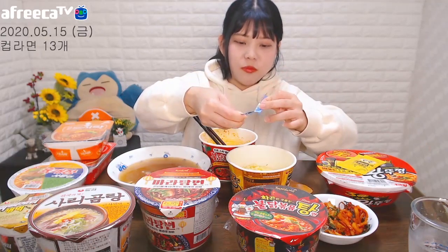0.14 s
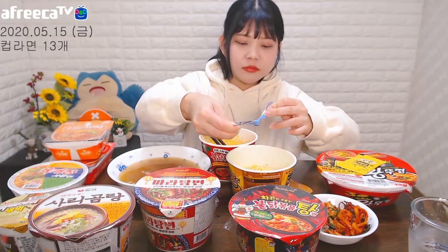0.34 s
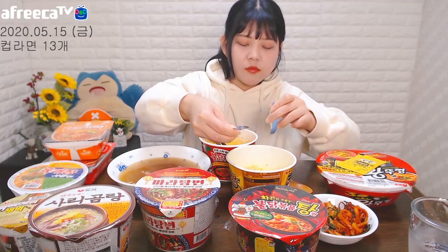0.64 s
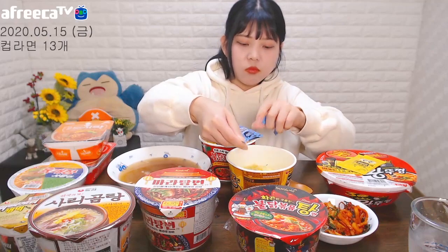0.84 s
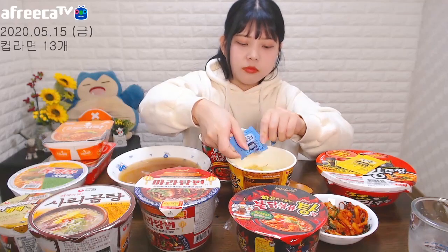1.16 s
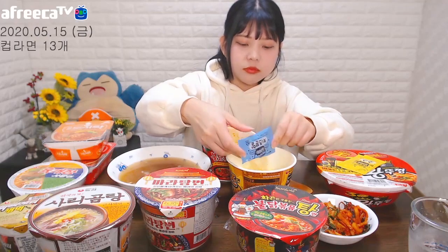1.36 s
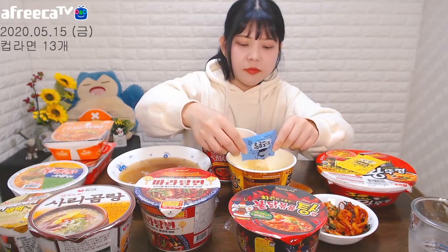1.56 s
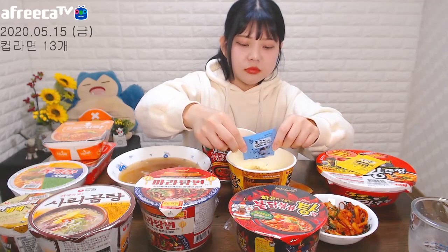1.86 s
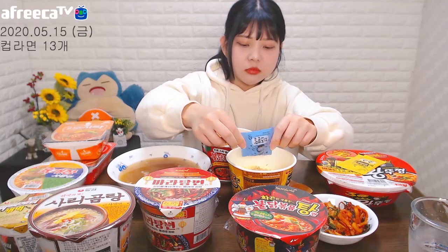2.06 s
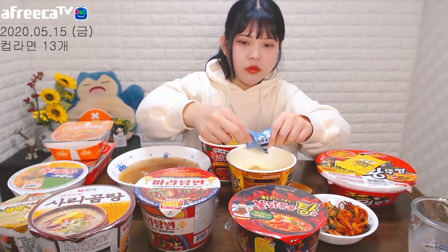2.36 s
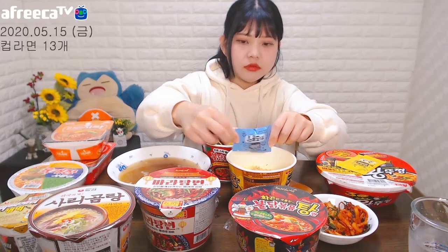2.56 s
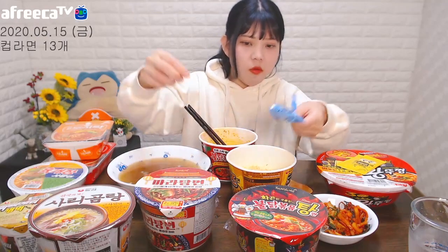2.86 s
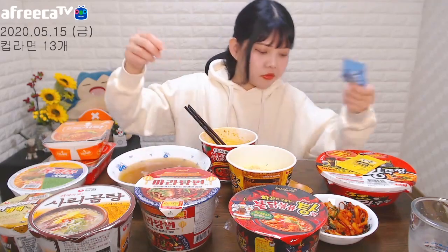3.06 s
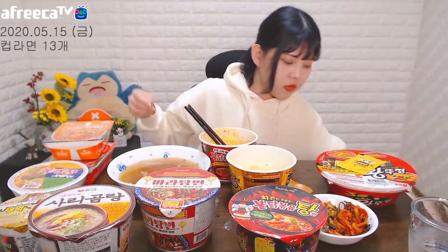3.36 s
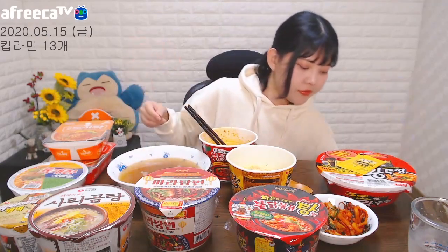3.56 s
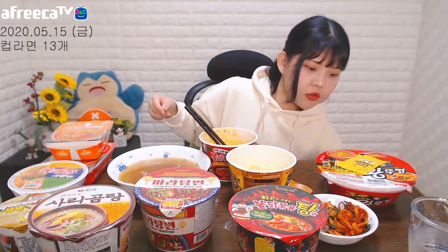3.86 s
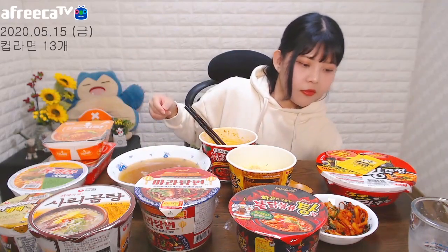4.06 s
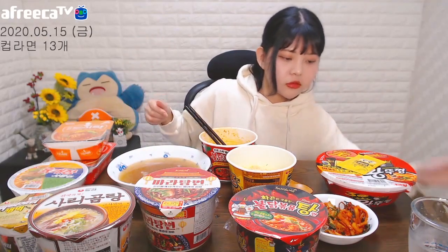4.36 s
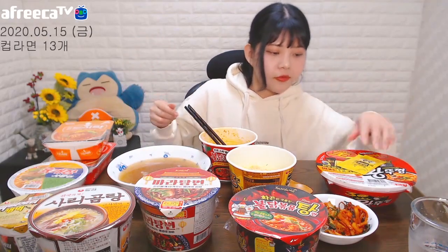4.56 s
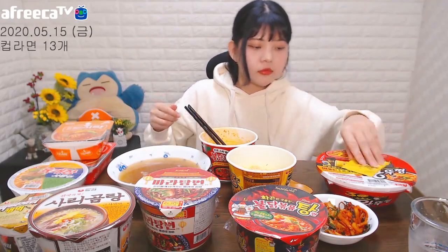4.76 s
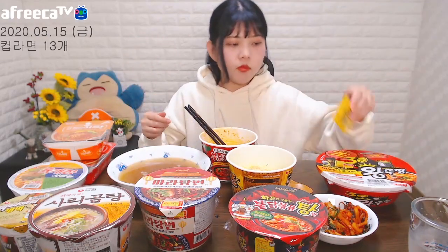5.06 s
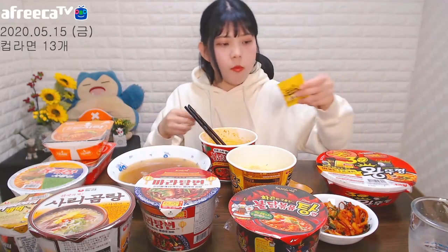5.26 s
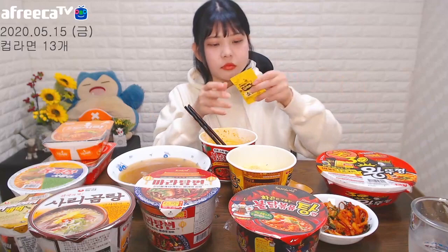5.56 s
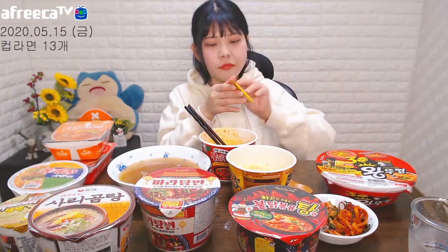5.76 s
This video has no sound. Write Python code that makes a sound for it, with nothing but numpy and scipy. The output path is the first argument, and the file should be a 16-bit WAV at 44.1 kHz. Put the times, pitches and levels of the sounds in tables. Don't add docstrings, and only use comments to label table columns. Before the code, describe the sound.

A small plastic sachet is handled close up: scattered light crinkles at first, then louder squeezing and a dense burst of tearing crackle. After it is dropped aside come sparse snaps, faint brushing, a dull thud and knock, and light handling of another packet. Small hard room, stereo microphone with dull treble and noise-suppressed quiet.

```python
import sys
import numpy as np
from scipy import signal
from scipy.fft import rfft, irfft, next_fast_len
from scipy.io import wavfile
from scipy.ndimage import uniform_filter1d, map_coordinates

SR = 44100
rng = np.random.default_rng(int(sys.argv[2]) if len(sys.argv) > 2 else 0)


def invert_db(level):
    return 10 ** (np.asarray(level, dtype=float) / 20)


def dump(signal):
    limited = np.clip(np.atleast_2d(signal).T, -1, 1)
    pcm = np.round(limited * 32767).astype(np.int16)
    wavfile.write(sys.argv[1], SR, pcm)


N = 260659


def unit(x):
    return x / np.sqrt(np.mean(abs(x) ** 2) + 1e-30)


def along(points, hz):
    f, v = np.transpose(points)
    return np.interp(np.log(hz + 1), np.log(f + 1), v)


def curves(rows, t=np.arange(N) / SR):
    s, *cols = np.transpose(rows)
    return [np.interp(t, s, c) for c in cols]


def wobble(rate_hz):
    knots = rng.standard_normal(int(N * rate_hz / SR) + 4)
    return map_coordinates(knots, [np.arange(N) * rate_hz / SR])


def patchy(shape, bins, frames):
    rough = rng.standard_normal(shape)
    return unit(uniform_filter1d(uniform_filter1d(rough, size=bins, axis=0), size=frames, axis=1))


def filtered(x, response):
    m = next_fast_len(x.shape[-1] + 8192)
    return irfft(rfft(x, m) * response(np.fft.rfftfreq(m, 1 / SR)), m)[..., :x.shape[-1]]


def modes(table, hz):
    total = 0
    for k, (centre_hz, width_hz, db) in enumerate(table):
        damping = 1j * hz * width_hz
        total = total + (-1) ** k * invert_db(db) * damping / (centre_hz ** 2 - hz ** 2 + damping)
    return total


def swells(s, db, rise_s, fade_s, t):
    s, db, rise_s, fade_s = (np.reshape(v, (-1, 1)) for v in (s, db, rise_s, fade_s))
    slope = np.maximum((s - t) / np.maximum(rise_s, .005), (t - s) / np.maximum(fade_s, .005))
    return invert_db(2 * np.maximum(db - 60 * slope, -130))


def loudness(*events):
    steps = np.arange(0, N, 32)
    return np.interp(np.arange(N), steps, np.sqrt(swells(*events, steps / SR).sum(axis=0)))


# frequency in Hz, left-right likeness 0..1.
LIKENESS = [(60, .85), (150, .95), (400, .97), (850, .92), (1150, .15), (2800, .25), (5000, .5), (9000, .3)]


def spread(pair):
    def mid_side(hz):
        turn = np.arccos(np.clip(along(LIKENESS, hz), -1, 1)) / 2
        return np.array([np.cos(turn), np.sin(turn)])
    mid, side = filtered(pair, mid_side)
    return np.array([mid + side, mid - side])


# time in s, left over right in dB, left hears later in ms, direct sound in dB.
HANDS = [(0, -3, 0.016, -1), (1, -1.5, 0.054, -1), (2.5, -1.2, 0.011, 3.5), (2.8, -0.5, 0.045, 0),
         (3.1, -4, 0.066, 0), (3.7, -2, 0.19, -1.5), (4.3, -7.5, 0.068, -3.5), (4.7, -4.5, 0.054, -0.5),
         (5.2, -6.5, .03, -3.5), (5.8, -3, 0.011, 1.5)]


def grains(s, hz, cycles, db, size):
    place = rng.standard_normal((len(s), 3))
    pan_db, lag_ms, _ = curves(HANDS, s)
    at = np.clip((s[:, None] * SR).astype(int) + np.arange(size), 0, N - 1).ravel()
    turns = np.arange(size) / SR * hz[:, None]
    attack = 1 - np.exp(-turns / 0.65)
    fade = invert_db(db[:, None] - 26 * turns / cycles[:, None]) * attack * np.sign(place[:, 2:])
    lag_turns = hz[:, None] * (lag_ms[:, None] / 2000 + 1.6e-5 * place[:, 1:2])
    step_db = 1.2 * place[:, :1] + pan_db[:, None] / 2 * np.clip(hz[:, None] / 1200, 0, 1)
    sides = []
    for side in (1, -1):
        wave = fade * invert_db(side * step_db) * np.sin(2 * np.pi * (turns - side * lag_turns))
        sides.append(np.bincount(at, wave.ravel(), N))
    return np.array(sides)


# frequency in Hz, level in dB per Hz.
FILM = [(710, -36), (1200, -6), (1430, -12), (2180, -5.5), (2360, -6.5), (3790, -9.5), (4700, -8.5),
        (6510, -11.5), (8000, -9), (10400, -53), (17600, -120)]
# start in s, peak in dB, facet in Hz, edge in dB, knock in dB.
FINGERING = [(0.0126, -40.5, 2000, -1, -11), (0.0442, -34, 5540, 1, -10), (.1112, -34.5, 5960, -7, -39),
             (.1145, -37, 2200, 4.5, -20), (.1215, -50.5, 2930, 6, -3), (0.2527, -33, 1980, 2, -8.5),
             (0.4543, -36.5, 2300, 3, 1), (.5187, -44, 1480, -13, 0), (0.6984, -47, 1620, -8, -1.5),
             (0.7214, -39, 6530, -33, -13.5), (.818, -53, 2200, -4, -20), (0.897, -41.5, 2200, -9, -23),
             (.9353, -35.5, 2970, -27, -7.5), (0.9609, -42, 2330, 8.5, 2.5), (0.9867, -33.5, 5070, -1, -29),
             (1.0121, -40, 4320, -5, -8), (1.034, -42, 2190, 1.5, 3.5), (1.045, -50, 2500, -11, 0),
             (1.0965, -32.5, 2190, -15, -6), (1.224, -43.5, 1870, 1, -4), (1.233, -42, 3000, -7, -6.5),
             (1.3154, -48, 3240, -2, -9), (1.3288, -48, 1750, 6, 6), (1.3745, -37.5, 1990, -30, -10.5),
             (1.4062, -44, 2200, 1, -7.5), (1.4536, -58, 2220, -17, -3), (1.479, -40.5, 2550, -5, -5)]
SQUEEZING = [(1.508, -30.5, 2530, -5, -2), (1.515, -21.5, 2810, -6.5, -20),
             (1.5447, -31.5, 2180, -19, -2.5), (1.5742, -31.5, 2220, 0.5, -1.5),
             (1.614, -43, 1830, -16, 6.5), (1.7017, -24, 2560, -8.5, -10.5), (1.745, -45, 1850, -2, -11),
             (1.7624, -33, 1760, -6.5, -4.5), (1.777, -37.5, 2060, -6.5, 0), (1.8034, -29, 4600, -7, -8),
             (1.8553, -24.5, 2200, 1, -11), (1.9035, -34, 2310, -0.5, -16.5),
             (1.9269, -33.5, 1920, -10.5, 4), (1.942, -33, 2220, -4.5, -5), (2.032, -31, 2130, -6, -6.5),
             (2.0511, -33.5, 2250, -7.5, -12), (2.085, -46.5, 2250, -7.5, -8.5)]
TEARING = [(2.1113, -36.5, 1960, -8.5, -5.5), (2.1198, -18, 2100, -6, -8),
           (2.127, -27.5, 4000, -14.5, -19.5), (2.1394, -27.5, 2000, -8, 1),
           (2.1455, -31.5, 2380, -7, -1.5), (2.1595, -23, 2230, -2.5, -8), (2.168, -27, 3580, -8.5, -11),
           (2.2043, -26, 2190, -5.5, -5), (2.229, -34, 2570, -12, -12), (2.2554, -20.5, 2270, -3, -13),
           (2.2853, -28.5, 2120, -6, -4.5), (2.3081, -23, 4300, -12.5, -7),
           (2.3267, -21, 2240, -15.5, -2.5), (2.337, -29, 2180, -6.5, 5), (2.3452, -26.5, 2690, -2, -6.5),
           (2.3551, -24, 2080, -2, -4), (2.3877, -27, 5750, -11.5, -14.5),
           (2.4044, -24.5, 2200, -8.5, -10.5), (2.413, -26, 2040, -1.5, -3.5),
           (2.4274, -25.5, 2800, -11, -7), (2.4367, -22.5, 2490, -3, -12), (2.4436, -19, 5500, -4, -12),
           (2.4492, -37, 2130, -12.5, -5), (2.455, -28.5, 4800, -11, -16.5), (2.4751, -27, 2700, -4.5, -13),
           (2.4885, -26, 4740, -5.5, -9.5), (2.5037, -25.5, 2240, -10, -6.5),
           (2.52, -35, 2300, -9.5, -10.5), (2.5452, -28.5, 2600, -13, -6.5), (2.581, -28, 2040, -7, -1),
           (2.6058, -26, 5070, -8.5, -9.5)]
DISCARDING = [(2.742, -46, 1920, -5, 5), (2.7981, -37.5, 3760, -35, -5.5), (2.81, -42.5, 1690, -24, -3),
              (3.05, -40.5, 4090, -31, -4), (3.063, -26.5, 2110, -11.5, -22.5),
              (3.448, -62.5, 1840, -21, -23), (3.459, -35, 1555, -20, -2), (3.5095, -35, 2490, -4.5, -13),
              (3.5683, -36.5, 4630, -21, -10), (3.7, -43.5, 1980, -2, 1), (3.711, -35, 1950, -14, -11),
              (3.799, -46, 2130, -11, -11), (3.894, -41.5, 1864, -18.5, 2.5), (3.964, -37.5, 2440, -9, -21),
              (3.804, -61, 2950, -15, -12), (4.1728, -48.5, 3086, -16, -17), (4.348, -57, 2460, -30, 5),
              (4.6129, -40.5, 1660, -4.5, -2.5)]
PICKING_UP = [(4.721, -44.5, 1590, -8, 6), (4.7608, -38, 3840, -22, -2), (4.807, -43.5, 1733, -17, -12),
              (4.9504, -48, 2160, 3.5, 4), (5.0957, -51, 3100, 3, -0.5), (5.1568, -48.5, 2135, -12, -3.5),
              (5.5095, -62, 2313, -15.5, 2), (5.692, -58, 3730, -3, 5), (5.77, -57, 2230, -2, -16),
              (5.571, -64.5, 3920, -21, -17.5), (5.8118, -36.5, 2250, -4, 6),
              (5.8852, -50.5, 2170, -9.5, -9)]
# ring in Hz of what lies under the film (cup, cup, cup, bin, lid).
KNOCKED_HZ = [964, 940, 932, 1157, 500]
# how long edges keep cracking in s; the later, farther handlings crack longer.
VOLLEY_S = [0.005, 0.0042, 0.007, 0.011, 0.024]
FLIP_S = [0.0054, 0.0099, 0.0074, 0.015, 0.013]


def snaps(count=8):
    tables = FINGERING, SQUEEZING, TEARING, DISCARDING, PICKING_UP
    rows = []
    for table, *shared in zip(tables, KNOCKED_HZ, VOLLEY_S, FLIP_S):
        rows += [(*row, *shared) for row in table]
    columns = (np.repeat(c, count) for c in np.transpose(rows))
    s, peak_db, facet_hz, edge_db, knock_db, knock_hz, volley_s, flip_s = columns
    draw = rng.random((len(s), 5))
    order = np.arange(len(s)) % count
    later = (order + draw[:, 0]) / count * (order > 0)
    db = peak_db + 3.5 - 20 * abs(later - .14) - 4 * draw[:, 1]

    facet_hz = facet_hz * invert_db(6 * (draw[:, 2] - .45) * (.25 + .75 * (order % 2)))
    facet = grains(s + flip_s * later, facet_hz, 3 + 5 * draw[:, 3], db - 2.5, size=240)

    edge_hz = 3300 * (7300 / 3300) ** ((order * 3 % count + draw[:, 4]) / count)
    late_edge = draw[:, 3] ** 1.8
    favoured_hz = np.repeat(3800 + 3000 * draw[::count, 1], count)
    edge_db = edge_db + 0.5 - 8.3 * abs(np.log2(edge_hz / favoured_hz))
    edge_db = peak_db - 8 * late_edge + edge_db + 3 + 0.78 * along(FILM[1:-2], edge_hz)
    edge = grains(s + volley_s * late_edge, edge_hz, 7 + 9 * draw[:, 0], edge_db, size=120)

    knock_s = s + 1.2 * flip_s * later + 0.00086
    knock_hz = knock_hz * invert_db(1.3 * (draw[:, 3] - .5))
    knock = grains(knock_s, knock_hz, 7 + 8 * draw[:, 2], db + knock_db - 7.0, size=640)
    return facet + edge + knock


# peak in s, level in dB, 60 dB fade in s, brightness in dB per octave.
GRIPS = [(0.01, -54, 1.37, -7.5), (0.25, -52.5, 0.36, 22.5), (0.454, -53.5, 0.3, -8),
         (0.709, -72.5, 9, -0.5), (0.903, -59, -1, -4), (0.961, -45, 0.3, -11.5), (1.097, -58.5, 0.6, -5),
         (1.23, -63, 2.5, 1), (1.329, -61, 5, -8.5), (1.509, -40.5, 0.26, 1), (1.699, -46, 0.44, 2.5),
         (1.855, -54.5, 0.43, -3), (2.033, -47, 0.4, -2), (2.118, -38, 0.33, 1.5), (2.304, -33, 0.4468, 3),
         (2.424, -33, 0.3758, -1.5), (2.203, -40, 0.81, -1.5), (2.581, -36.5, 0.0457, -2),
         (2.609, -57, 0.09, -5.5), (2.799, -71.5, 1.2, -12), (3.064, -68.5, 0.37, -5),
         (3.464, -51, 0.5, -12.5), (3.559, -78, 1.5, 9), (3.705, -63, 0.8, -5), (3.897, -55, 0.68, -15),
         (3.968, -66, .5, -16), (4.171, -66.5, 0.2, -11), (4.349, -72.5, .5, -13), (4.613, -51.5, 0.33, -9),
         (4.752, -65, 0.89, -13.5), (4.934, -65, 0.96, -10.5), (5.098, -69.5, 0.3, -11.5),
         (5.808, -52, 0.1, 5.5)]
GRIP_RISE_S = 0.017


def crackle(count=8000):
    draw = rng.random((count, 4))
    s, hz = draw[:, 0] * N / SR, 1200 * (7600 / 1200) ** draw[:, 1]
    peak_s, peak_db, fade_s, bright_db = np.transpose(GRIPS)
    power = swells(peak_s, peak_db, GRIP_RISE_S, fade_s, s)
    level_db = 10 * np.log10(power.sum(0))
    bright_db = bright_db @ power / power.sum(0)
    patches = rng.standard_normal((140, 12))
    patch_db = 4 * map_coordinates(patches, [draw[:, 0] * 139, draw[:, 1] * 11])
    clump_db = 6.1 * wobble(40)[(s * SR).astype(int)] + patch_db
    tilt_db = (bright_db + 7.6) * np.log2(hz / 3000)
    db = level_db + 8.0 + tilt_db + along(FILM, hz) + clump_db - 7 * draw[:, 2]
    return grains(s, hz, 4 + 14 * draw[:, 3] ** 2, db, size=200)


# frequency in Hz, level in dB per Hz.
SIZZLE = [(1100, -38), (1700, -0.5), (2200, 2.5), (3500, -2.5), (5000, -2.5), (6500, -8), (8500, -8.5),
          (11000, -11.5)]


def sizzle():
    peak_s, peak_db, fade_s, _ = np.transpose(GRIPS)
    hz, _, z = signal.stft(rng.standard_normal((2, N)), SR, nperseg=256)
    level_db = along(SIZZLE, hz)[:, None] + 5 * patchy(z.shape[1:], bins=4, frames=6)
    hiss = signal.istft(z * invert_db(level_db), SR, nperseg=256)[1][:, :N]
    side_db = curves(HANDS)[0] / 2 * np.array([[1], [-1]])
    gain = loudness(peak_s, peak_db - 6, GRIP_RISE_S, 1.046 * fade_s)
    return gain * invert_db(side_db) * unit(spread(hiss))


# start in s, peak in dB, ring in Hz.
BUMPS = [(0.104, -48.5, 500), (.255, -53, 408), (.456, -60, 242), (.53, -51, 656), (1.511, -51.5, 284),
         (1.514, -39, 530), (1.58, -41.5, 624), (1.703, -34, 529), (1.706, -53, 312), (1.925, -40, 548),
         (1.93, -48, 270), (2.119, -41.5, 305), (2.145, -32.5, 526), (2.33, -43, 203), (2.345, -34, 523),
         (2.44, -37.5, 555), (2.494, -37, 669), (2.565, -42.5, 424), (3.53, -52, 835), (3.555, -51.5, 803),
         (3.97, -40, 1233), (4.008, -51, 1230), (4.05, -51, 1240), (4.095, -51.5, 1201),
         (4.612, -48.5, 156), (0.139, -47.5, 598), (2.033, -39, 480), (2.055, -49, 550),
         (2.934, -64.5, 253), (3.157, -62, 258), (3.25, -63, 652), (3.288, -58, 718), (3.419, -59, 367),
         (3.776, -60, 302), (3.962, -43, 245), (4.246, -59, 596), (4.47, -63.5, 620), (4.951, -48, 428),
         (5.147, -55, 441), (3.505, -42, 824), (4.348, -56.5, 243.5), (4.612, -36, 268.7),
         (4.611, -32, 822), (4.623, -37.5, 733), (4.716, -41.5, 618), (4.644, -42.5, 704),
         (4.75, -39.5, 682), (4.778, -46, 455), (5.458, -54.5, 449), (5.477, -61.5, 556), (5.609, -53, 558),
         (5.637, -46.5, 459), (5.688, -47, 476), (.168, -50, 670), (0.116, -49.5, 950), (1.142, -52.5, 950),
         (4.034, -48, 500), (3.425, -62, 712), (4.169, -57, 1260)]


def bumps(count=4):
    s, peak_db, hz = (np.repeat(c, count) for c in np.transpose(BUMPS))
    draw = rng.random((len(s), 3))
    later_s = 0.013 * draw[:, 0] * (np.arange(len(s)) % count > 0)
    hz = hz * invert_db(1.9 * (draw[:, 1] - .5))
    return grains(s + later_s, hz, 5 + 5 * draw[:, 2], peak_db - 3.0, size=1200)


# centre in Hz, width in Hz, level in dB.
LID = [(455, 230, -5.5), (530, 38, 1), (632, 95, -2.5)]
CUP = [(738, 55, -6.5), (802, 53, -6), (925.6, 25, 1), (1026, 27, -4.5), (1123, 45, -0.5),
       (1260, 100, -3.5)]
TABLE = [(230, 49, -3), (282, 24, 2), (367, 31, -3)]
SUDDEN_S = .012
# peak in s, level in dB, 60 dB rise in s, 60 dB fade in s,
# place (0 lids, 1 cup, 2 table top).
BRUSHES = [(.05, -54.5, 2, -0.5, 0.95), (.13, -61, 5.5, 0.77, 0), (0.462, -57.5, 1.5, 1.2, 0.96),
           (0.975, -52.5, 0.23, 0.57, 0.61), (1.231, -61.5, 0, 6.5, 0.8), (1.516, -42, 0.11, 0.4, 0.73),
           (1.708, -46, 0.1, 0.33, 0.92), (1.781, -50.5, -2.4, 0.5, 1.05), (1.923, -33.5, 0.15, 0.13, 0.64),
           (2.158, -36.5, 0.35, 0.47, 0.51), (2.215, -43, -0.74, .5, 0.89), (2.29, -37, 0.04, .5, 0.77),
           (2.51, -44, 2.3, 0.55, 0.9), (2.35, -22.5, 0, -1.04, 0.81), (2.429, -35, 0.74, 0.5, 0.77),
           (2.598, -41.5, 3, -1.22, 0.77), (2.745, -57, SUDDEN_S, 0.46, 1.48),
           (2.812, -60, SUDDEN_S, 0.6, 1.4), (2.94, -66, -0.3, 1.5, 1.43),
           (3.071, -58.5, SUDDEN_S, 0.74, 1.03), (3.471, -64, 0.1, 0.5, 1.7), (3.719, -62.5, 0, 3, 1.65),
           (3.97, -43, 0.19, 0.41, 0.96), (4.36, -75.5, 1.5, 2.4, 0.39),
           (4.615, -45.5, SUDDEN_S, 0.46, 0.3), (4.72, -49.5, SUDDEN_S, 0.96, 0.32),
           (4.949, -54.5, 0.2, 0.8, 1.23), (5.45, -64.5, SUDDEN_S, 0.5, 0.72),
           (5.66, -59, 0.06, 0.56, 0.42), (5.81, -52.5, SUDDEN_S, 0.47, 0)]


def rustle():
    out = 0
    s, db, rise_s, fade_s, place = np.transpose(BRUSHES)
    bodies = (LID, 2.5, 950), (CUP, -3, 3000), (TABLE, -1, 450)  # modes, dB, silent above Hz
    for k, (body, body_db, top_hz) in enumerate(bodies):
        def soft(hz):
            low_cut = (.85 * body[0][0] / (hz + 1)) ** 8
            return modes(body, hz) / (1 + 1j * hz / 1500) ** 2 / (1 + low_cut + (hz / top_hz) ** 8)
        place_loss_db = 11 * (place - k) ** 2
        gain = loudness(s, db + body_db - place_loss_db, rise_s, fade_s)
        taps = (rng.random(N) < 900 / SR) * invert_db(2.5 * wobble(35)) * rng.standard_normal((2, N))
        out = out + gain * invert_db(-5.0) * unit(filtered(taps, soft))
    return spread(out)


# frequency in Hz, t60 in s.
ROOM = [(200, 0.6), (600, 0.026), (950, 0.18), (1500, 0.29), (2200, 0.2), (4000, 0.14), (9000, 0.19)]


def room(x, size=SR // 4):
    out = np.zeros((2, N + SR))
    for start in range(0, N, size):
        hz, t, z = signal.stft(rng.standard_normal((2, SR // 2)), SR, nperseg=256)
        decay = invert_db(-60 * t / along(ROOM, hz)[:, None])
        tail = spread(signal.istft(z * decay, SR, nperseg=256)[1])
        wet = signal.fftconvolve(x[:, start:start + size], tail / np.linalg.norm(tail[0]), axes=1)
        out[:, start + 90:start + 90 + wet.shape[1]] += wet
    return out[:, :N]


# peak in s, level in dB.
SHIFTS = [(0.0, -62.5), (.71, -69), (.92, -69), (1.12, -70), (1.24, -66.5), (1.68, -66.5), (1.92, -64),
          (2.191, -63), (2.898, -67), (3.11, -75), (3.608, -66.5), (4.08, -66.5), (4.411, -56.5),
          (4.62, -59.5), (4.74, -60), (4.85, -62), (5.199, -72), (5.401, -66.5), (5.71, -67.5), (5.84, -68)]
# peak in s, level in dB, 60 dB rise in s, 60 dB fade in s.
SWAY = [
    (1.501, -80.5, 11, 10),
    (4.382, -53, 0.21, 3.2),
    (4.699, -57, 0.69, 1.05),
    (5.419, -78, 0.54, .6),
    (5.69, -80, .4, 2.5),
]
# peak in s, level in dB, 60 dB rise in s, 60 dB fade in s.
THUDS = [
    (0.02, -63.5, 0.92, 1.06),
    (1.68, -58.5, 0.29, 3.4),
    (2.33, -59, 0.64, 1.4),
    (3.6, -75.5, 0.71, 0.37),
    (4.439, -63, 0.36, 0.91),
    (4.614, -48, 0.018, 0.7),
    (5.69, -69.5, 0.39, 1.27),
]


def rumble():
    def lumps(events, centre_hz, width_hz, lump_db):
        noise = filtered(rng.standard_normal((2, N)), lambda hz: np.exp(-((hz - centre_hz) / width_hz) ** 2))
        return loudness(*np.transpose(events)) * unit(invert_db(lump_db * wobble(7.6)) * noise)
    chair = lumps(SWAY, 25, 10, 2.5)
    sleeves = lumps(THUDS, 140, 42, 3.5)
    mode_hz = 59 + 10 * np.array([wobble(20), wobble(20)])
    mode = 1.4 * np.sin(2 * np.pi * np.cumsum(mode_hz, axis=1) / SR)
    pumped = loudness(*np.transpose(SHIFTS), 0.41, 1) * mode
    return spread(chair + sleeves + pumped)


# frequency in Hz, level in dB per Hz.
AIR = [(30, 5), (110, 5.5), (271, -4), (440, -9), (540, -19), (740, -16.5), (950, -6), (1270, -8),
       (1460, -12), (1660, -6.5), (1900, -12.5), (2300, -12.5), (4000, -25.5), (9000, -49), (11700, -78.5),
       (19800, -120)]
# time in s, level in dB.
STIR = [(0, 9.5), (.6, 1.5), (.85, 4), (1.3, 11), (2.7, 1.5), (3, -7.5), (3.2, -1), (3.4, -4.5), (3.6, 1),
        (4.3, 2), (4.55, -5.5), (5, 4), (5.35, -8.5), (5.6, -0.5), (5.91, -1)]
# time in s, level in dB.
WHINE = [(0, -110), (4.6, -105), (5.1, -77), (5.35, -83.5), (5.6, -78), (5.91, -71)]


def background():
    hz, _, z = signal.stft(rng.standard_normal((2, N)), SR, nperseg=1024)
    level_db = along(AIR, hz)[:, None] + 6.5 * patchy(z.shape[1:], bins=3, frames=7)
    air = signal.istft(z * invert_db(level_db), SR, nperseg=1024)[1][:, :N]
    tone = np.sin(2 * np.pi * np.cumsum(1295 + 9 * wobble(60)) / SR)
    tone = tone * invert_db(curves(WHINE)[0] - 3 + 3 * wobble(25))
    return invert_db(curves(STIR)[0] - 76.5) * unit(spread(air)) + tone


def scene():
    near = snaps() + bumps()
    swarm = crackle() + sizzle()
    brush = rustle()
    wet = room(invert_db(-1.0) * near + invert_db(-3.5) * swarm + invert_db(-6.0) * brush)
    direct = invert_db(curves(HANDS)[2]) * (near + invert_db(-0.5) * swarm)
    tilt = invert_db(np.array([[-.7], [.7]]))
    return direct + brush + tilt * (wet + rumble()) + background()


def low_pass(x):
    return signal.sosfilt(signal.butter(12, 10110, fs=SR, output="sos"), x)


# frequency in Hz, level in dB.
MIC = [(20, -11.5), (45, 0), (6500, -0.5), (7400, -5), (7900, -10), (9500, -14), (10000, -48.5)]
# frequency in Hz, level in dB.
GATE = [(100, -100), (1000, -104), (3000, -108), (6500, -106), (7800, -103)]


def record(dry):
    heard = filtered(dry, lambda hz: invert_db(along(MIC, hz)))
    hz, _, z = signal.stft(heard, SR, nperseg=512, noverlap=384)
    power = np.mean(abs(z) ** 2, 0)
    power = abs(uniform_filter1d(uniform_filter1d(power, size=3, axis=0), size=5, axis=1))
    keep = (power / (power + invert_db(2 * along(GATE, hz))[:, None])) ** 3.5
    mix = signal.istft(z * np.maximum(keep, invert_db(-10.0)), SR, nperseg=512, noverlap=384)[1][:, :N]
    return low_pass(mix)


dry = scene()
out = record(dry)
dump(out)
```